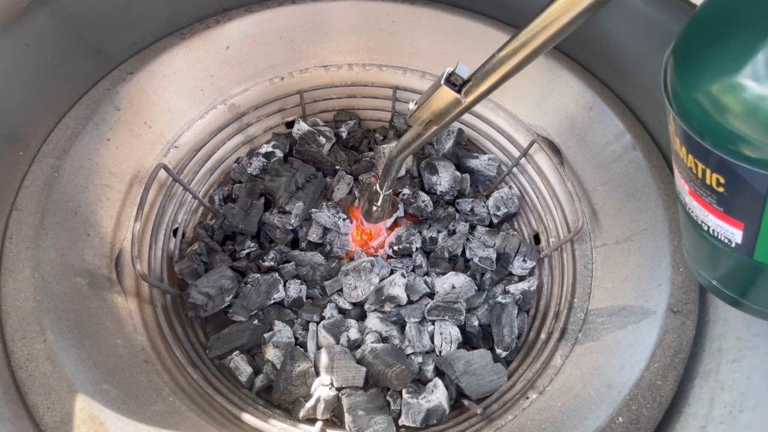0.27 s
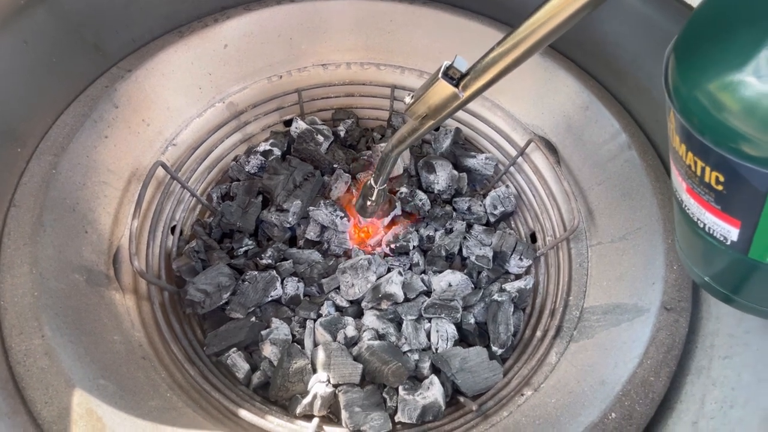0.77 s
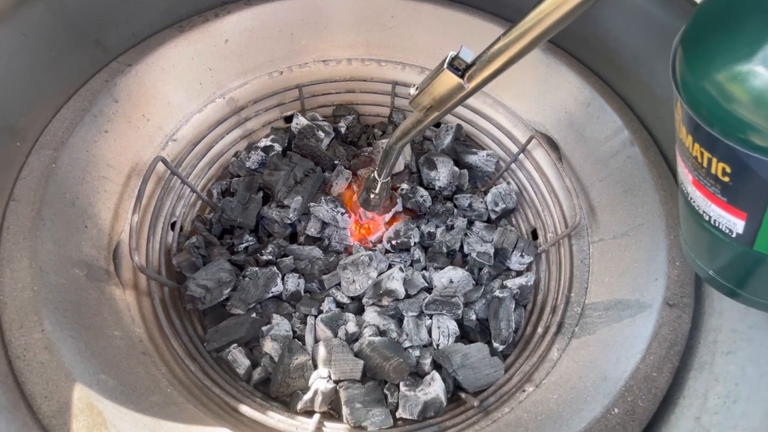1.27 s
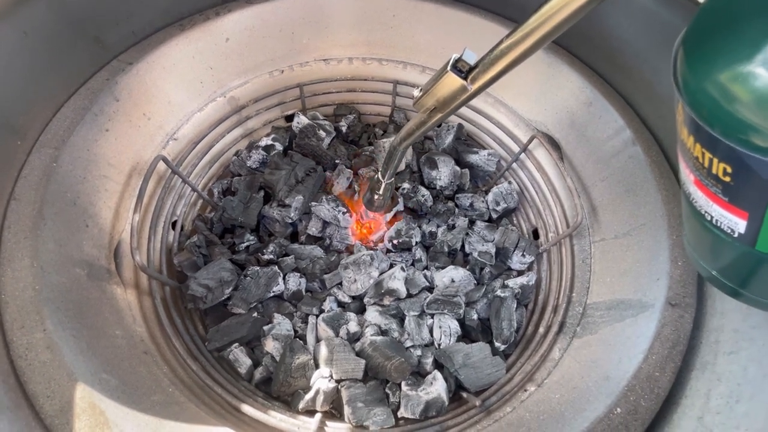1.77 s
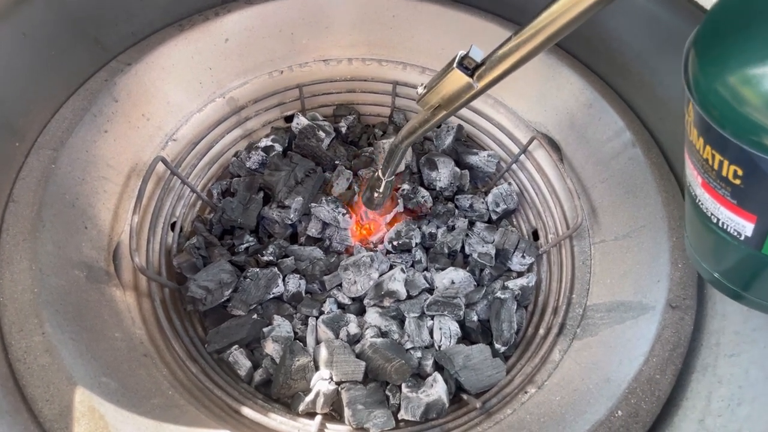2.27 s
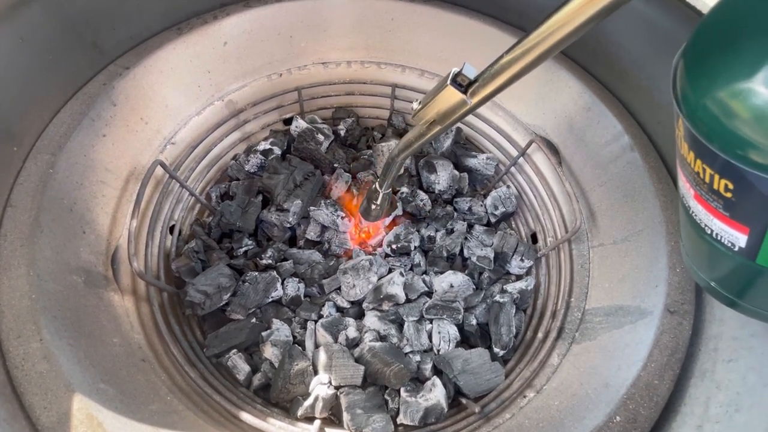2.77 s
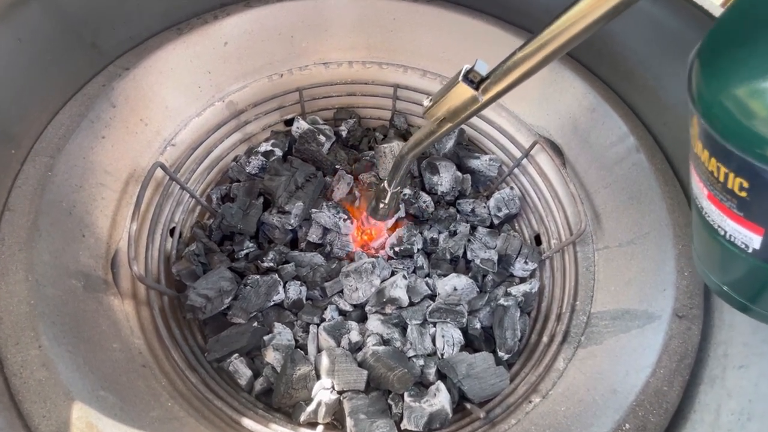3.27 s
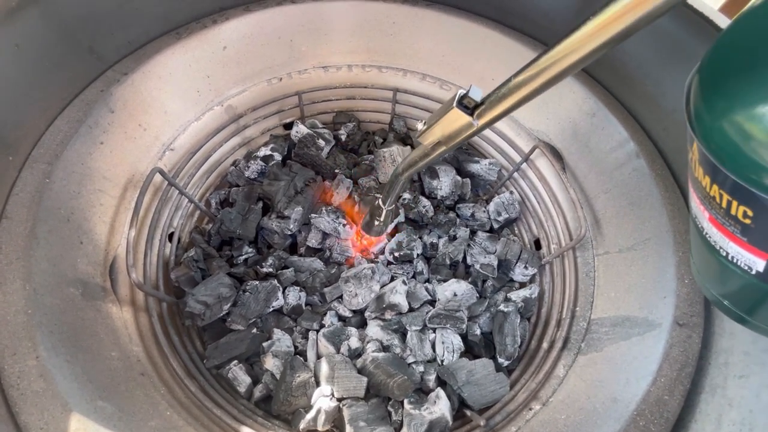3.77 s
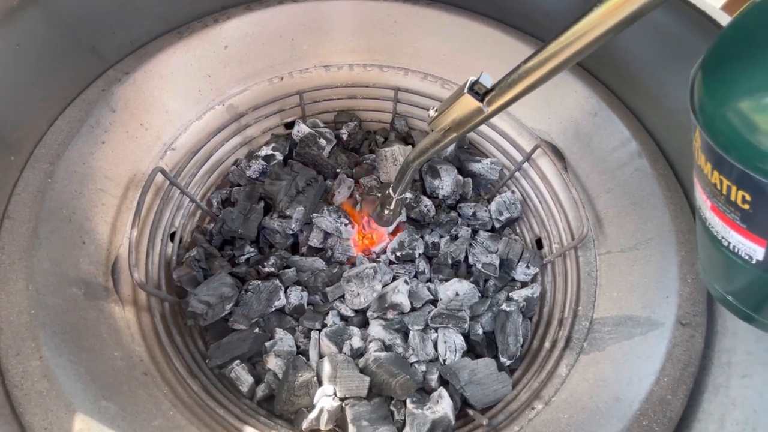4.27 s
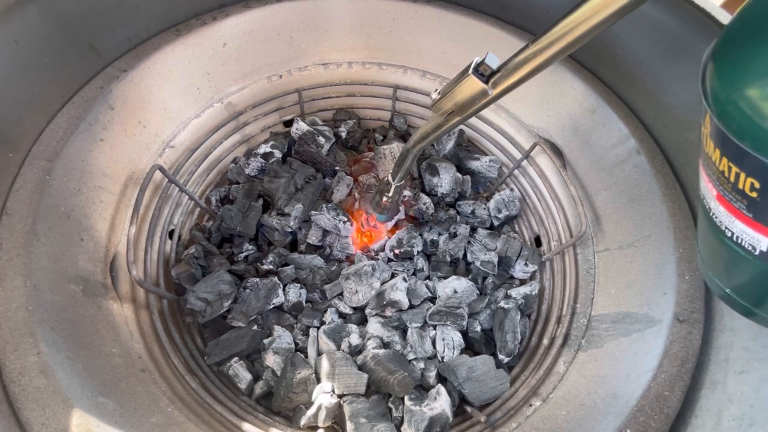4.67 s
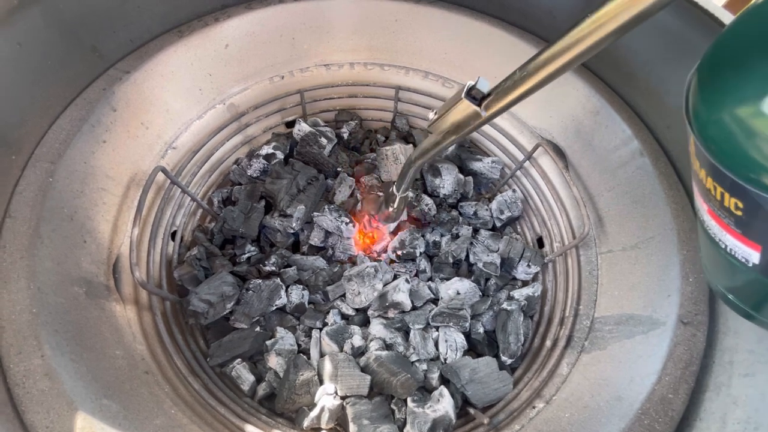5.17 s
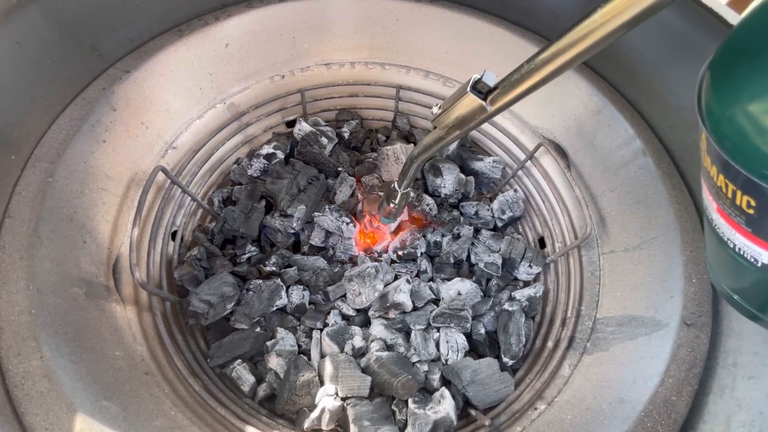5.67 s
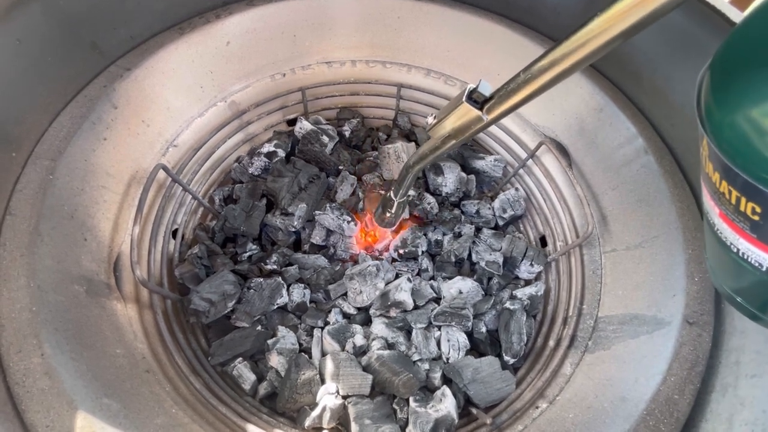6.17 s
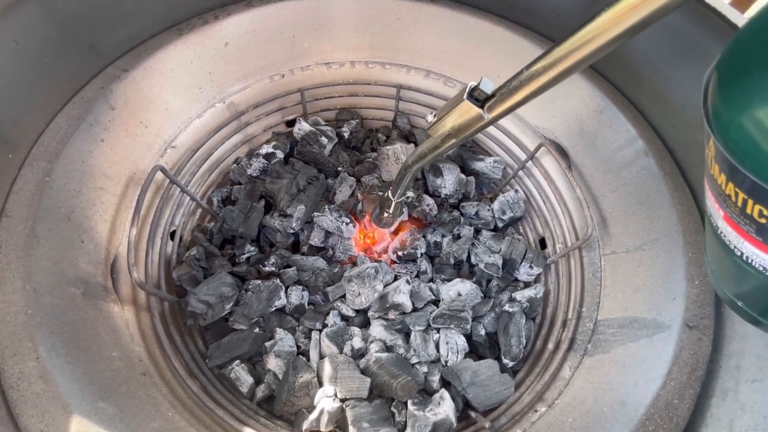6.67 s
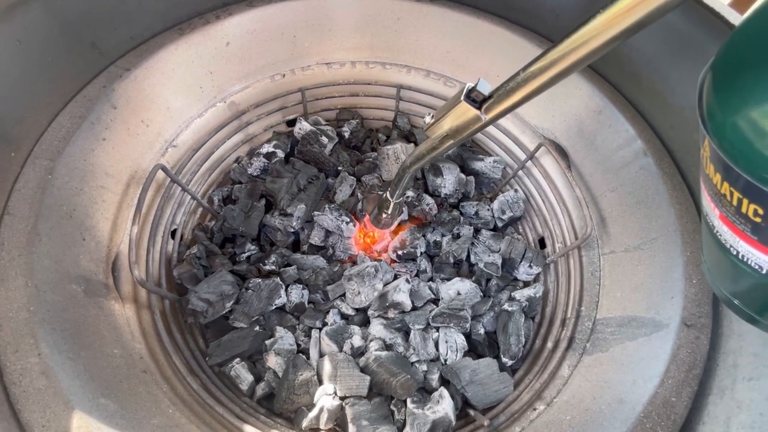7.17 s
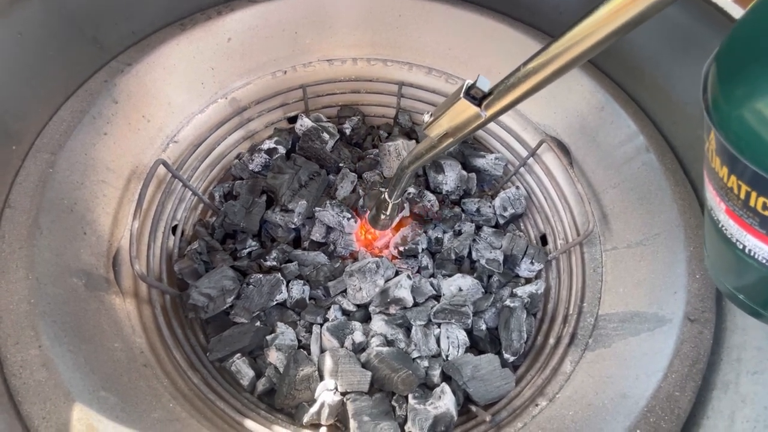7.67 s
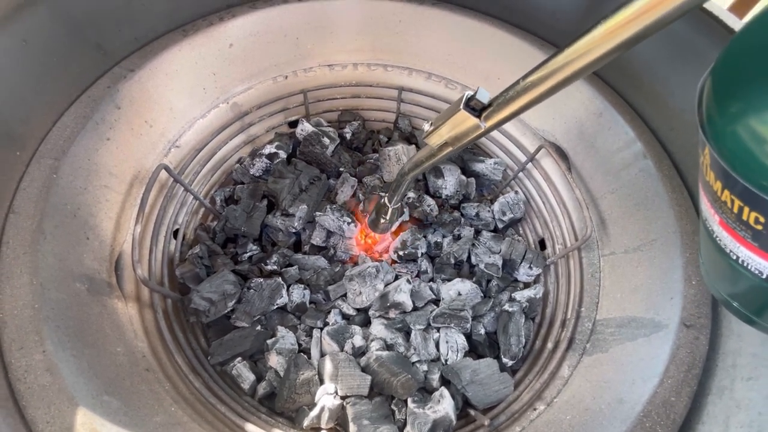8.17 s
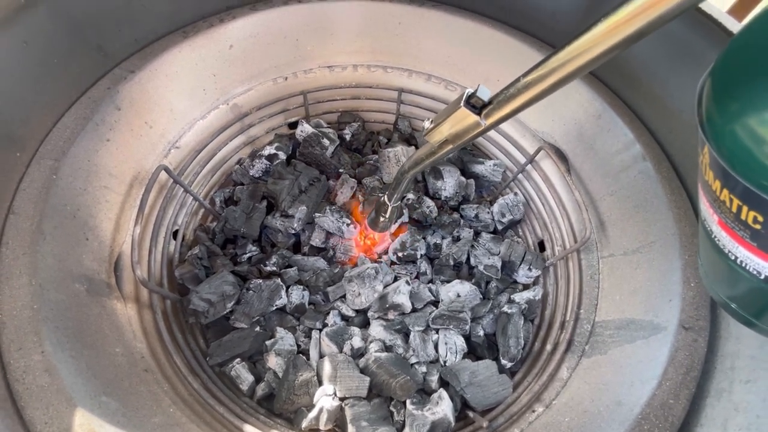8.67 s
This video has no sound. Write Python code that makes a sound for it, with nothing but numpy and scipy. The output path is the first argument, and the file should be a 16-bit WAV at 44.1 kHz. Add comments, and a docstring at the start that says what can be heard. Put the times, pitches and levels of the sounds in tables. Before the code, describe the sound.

Outdoors, a torch jet rushes and nearly whistles at moments while its flame flares, falters, then roars low in a charcoal bowl as wind buffets.

```python
"""A bright gas hiss opens over a fluttering flame: a propane torch on charcoal in a round grill outdoors.
The jet is noise coloured by drifting burner resonances, some of which nearly whistle for a moment.
The flame is low noise that flares, falters, then holds as a roar, with sine bursts for catching gas pockets.
Halfway through, lumpy bass noise rumbles as a gust on the two microphone ports."""
import sys
import numpy as np
from scipy import signal
from scipy.fft import rfft, irfft
from scipy.io import wavfile
from scipy.ndimage import uniform_filter1d

SR = 44100
rng = np.random.default_rng(int(sys.argv[2]) if len(sys.argv) > 2 else 0)


def master(y):
    """Save y as 16-bit WAV."""
    cut = np.clip(np.atleast_2d(y).T, -1, 1)
    pcm = np.round(cut * 32767)  # scale
    wavfile.write(sys.argv[1], SR, pcm.astype(np.int16))


N = 393813

# Levels in the tables are relative: port trims and the levels in the functions come on top.
# Gusts on the ports: (time of the top [s], level [dB], half length [s])
GUSTS = [(1.46, -50, 0.14), (3.83, -41, .14), (4.28, -27.5, 0.15), (4.55, -26, 0.099), (4.87, -28.5, 0.11),
         (5.03, -32, .08), (5.24, -33, 0.12), (5.65, -41, 0.22), (6.7, -42, .65), (8.4, -37, 0.47)]
# Colour of the wind: (frequency [Hz], density [dB per Hz])
WIND_COLOUR = [(20, -29), (40, -8), (62, 0.5), (110, -3), (200, -18), (500, -36), (1200, -62)]
# Breeze tearing at the flame: (time of the top [s], level [dB], half length [s])
FLUTTERS = [(.35, -41, 0.046), (.62, -34, 0.016), (1.25, -42, 0.06), (1.48, -34, 0.15),
            (1.852, -36.5, 0.16), (2.133, -37, 0.047), (2.32, -33, 0.033), (2.88, -38, 0.045),
            (3.87, -37, 0.11), (4.526, -28.5, 0.031)]
# Colour of the tearing flame: (frequency [Hz], density [dB per Hz])
TEAR_COLOUR = [(25, -64), (70, -23), (140, 2), (210, 0.5), (400, -7), (600, -14), (1200, -37), (3000, -63)]
# Flare-ups before the flame holds: (time of the top [s], level [dB], half length [s])
FLARES = [(.08, -35.5, 0.28), (.55, -33, 0.09), (.78, -32.5, 0.14), (1.07, -30, 0.17), (1.37, -25.5, 0.23),
          (1.85, -37.5, 0.18), (2.19, -30, 0.075), (2.28, -32, 0.078)]
# Falters that reshape the flares: (time [s], level change [dB], half length [s])
FALTERS = [(.40, -15, 0.054), (0.66, 1, .015), (0.895, -10, .025), (2.039, -13, 0.048), (2.39, -4, .03)]
# Colour of the roar in the bowl: (frequency [Hz], density [dB per Hz])
BOWL_COLOUR = [(22, -55), (45, -29), (75, -11), (115, -8), (145, 2), (170, -0.5), (200, -10.5), (235, -14),
               (262, -27), (298, -10), (330, -16.5), (380, -31.5), (480, -46), (900, -73)]
# Pockets of gas catching at once: (time [s], peak level [dB])
PUFFS = [(.066, -22.5), (0.613, -24), (1.152, -21), (1.232, -21), (1.323, -19), (1.404, -19), (1.494, -23),
         (2.136, -17), (2.452, -15.5), (2.537, -15), (2.571, -16), (2.701, -13), (2.851, -16.5),
         (3.74, -15.5), (3.802, -14), (4.194, -13.5), (4.687, -15.5), (6.053, -12), (6.682, -11.5),
         (6.89, -14), (6.928, -11.5), (7.012, -14.5), (7.056, -10.5), (7.316, -12), (7.764, -14.5),
         (7.997, -19), (8.435, -12.5)]
# Broad rush between the resonances: (frequency [Hz], density [dB per Hz], left minus right [dB])
RUSH = [(50, -50, 0), (100, -24, 2), (160, -2, -5), (258, -14, 0), (480, -10.5, 0), (840, -16, -2),
        (1257, -9, -3.5), (1450, -17.5, 0.5), (1880, -9.5, .5), (2400, -18, -1), (3000, -12, 0.5),
        (3200, -15, 1), (3500, -19, 2), (4330, -17.5, -2), (4860, -13, 0), (5550, -8, -4), (7250, -18, 2),
        (9500, -16, -2), (11000, -22.5, 0), (12960, -22, 2), (14700, -46, 1), (15500, -17, -2)]
# Resonances of burner and coals: (frequency [Hz], half-power width [Hz], level [dB], left minus right [dB])
RESONANCES = [(316.4, 28, -.5, -7.5), (608, 131, -11.5, -17), (950, 64, -8.5, -10.5),
              (1035.6, 33, 1.5, -1.5), (1668, 52, 3.3, -2.5), (2212, 48.5, 2, -2.5), (2514, 185, -10, -3.5),
              (2870, 110, -9.5, 0), (3413, 160, -12, -5), (3952, 220, -8.5, -0.5), (4666, 137, -5, 0.5),
              (5216, 95, -0.2, 4.5), (5763, 195, 0, -2.5), (6136, 195, -1.3, -6), (6357, 132, 0.34, -1.5),
              (6850, 190, -3, -0.5), (7540, 160, -11, 1), (8140, 260, -11, 6), (9070, 300, -24, 0),
              (10220, 200, -12, -4), (10730, 156, -11.5, -1), (11360, 210, -9.5, -.5), (11700, 200, -20, 0)]
# Extra phase by which bowl echoes make the left port trail: (frequency [Hz], lag [radians])
PORT_LAG = [(150.0, 0.0), (380.0, -1.1), (500.0, 1.9), (640.0, -0.5), (1030.0, -0.9), (1300.0, 0.7),
            (1450.0, -1.2), (1670.0, -1.5), (2215.0, -1.1), (3100.0, -0.6), (3600.0, -0.9), (3800.0, 0.5),
            (4660.0, 0.6), (5220.0, 2.6), (5480.0, 6.9), (5800.0, 6.3), (6000.0, 4.7), (6300.0, 6.2),
            (7100.0, 7.3), (7600.0, 4.1), (8900.0, 3.2), (9450.0, 6.3), (10600, 0), (12400, -6),
            (14000, -12)]
# Likeness of the hiss at the two ports: (frequency [Hz], likeness [0 to 1])
PORT_LIKENESS = [(250.0, 0.33), (320.0, 0.81), (460.0, 0.92), (700.0, 0.54), (820.0, 0.26), (950.0, 0.81),
                 (1150.0, 0.84), (1350.0, 0.39), (1650.0, 0.65), (2050.0, 0.78), (2220.0, 0.92),
                 (2600.0, 0.43), (3250.0, 0.98), (3650.0, 0.57), (4050.0, 0.82), (4400.0, 0.93),
                 (4700.0, 0.57), (5200.0, 0.75), (5480.0, 0.1), (5700.0, 0.69), (6350.0, 0.5),
                 (7050.0, 0.75), (7550.0, 0.29), (8300.0, 0.89), (9000.0, 0.35), (11000, 0.97),
                 (13000, 0.56)]
# Level of the jet's brightest hiss: (time [s], level [dB])
HISS = [(0.0, -3), (.6, -2.8), (1.24, -1), (1.4, -5), (1.66, -0.5), (1.9, -2), (2.3, -1.5), (2.6, -1.6),
        (3.4, -1.8), (3.7, -2), (4.3, -3), (4.62, 1), (4.86, -5), (5.3, -1), (6.4, -1.9), (7.42, 0.5),
        (8.5, -1), (8.92, 0)]
# How the flame's reach into the coals recolours the jet: (frequency [Hz], tilt [dB per unit of reach])
REACH_COLOUR = [(200, -1.5), (320, 1), (500, -0.5), (1100, -0.5), (1700, -0.5), (2600, 0.1), (4500, 0.55),
                (5200, 0), (6600, -0.5), (8000, 0.3), (9300, 0), (11000, -0.7)]
# Moments of near-whistling: (time of the top [s], pitch [Hz], lift [dB], half length [s])
SINGS = [(1.1, 6340, 7.5, .2), (1.667, 6630, 10, .12), (2.3, 6340, 4.5, 0.24), (2.798, 5260, 9.5, 0.13),
         (3.4, 6290, 11.5, 0.094), (4.0, 5170, 4.5, 0.12), (4.2, 6270, 6, 0.09), (4.58, 5820, 0, 0.17),
         (5.27, 6650, 5, 0.076), (5.862, 6380, 5, 0.25), (7.3, 5740, 6, .4), (7.847, 2280, 5, 0.073),
         (8.883, 6230, 7.5, 0.18)]

# The flame catches again with a deep whump
WHUMP_S, WHUMP_DB, WHUMP_DECAY_S = 2.118, -31, 0.041
PUFF_RISE_S, PUFF_FALL_S = 0.0099, 0.016
# The flame holds; its roar grows as the coals heat up, then eases a little
HOLD_S, CATCH_S = 2.44, 0.0089
FULL_S, FULL_DB, GROW_DB_PER_S, EASE_DB_PER_S = 6.9, -22, 0.5, 0.85
# The deep bass fills in as the fire grows
THIN_DB, FILL_DB_PER_S, FILLED_DB = -39, 8, -2.5
# The burner's resonances rise as it heats: share of their pitch per second, and when they are in tune
HEAT_PER_S, IN_TUNE_S = 0.0014, 4.5
# The jet starts a little soft and comes up to strength
SOFT_DB, WARM_S = -0.3, 1
# The hand settles once, and the flame digs deeper into the coals
SETTLE_S, SETTLE_TAKES_S, REACH_BEFORE, REACH_AFTER = 5.04, 0.35, -1, 2
SING_WIDTH_HZ = 84
PORT_DELAY_S = 0.000476  # the hiss reaches the left port later than the right
EDGE_HZ = 15750


def gain_of(db):
    """Decibels to amplitude."""
    return 10 ** (np.asarray(db) / 20)


def evened(x):
    """Scales to an rms of one."""
    return x / np.sqrt(np.mean(x ** 2) + 1e-20)


def read(points, hz, axis=1):
    """One column of a spectrum table, joined on a log-frequency axis."""
    table = np.array(points)
    return np.interp(np.log(hz + 1), np.log(table[:, 0] + 1), table[:, axis])


def follow(rows, t, axis=1):
    """One column of a curve at the times t."""
    table = np.array(rows)
    return np.interp(t, table[:, 0], table[:, axis])


def coloured(points):
    """Noise shaped to the given spectrum, at an rms of one."""
    spectrum = rfft(rng.standard_normal(N))
    colour = gain_of(read(points, np.fft.rfftfreq(N, 1 / SR)))
    return evened(irfft(spectrum * colour, N))


def patches(shape, seconds, width_hz, step_s, step_hz):
    """A smooth random field over time and frequency, with blobs of the given size."""
    along = np.fft.fftfreq(shape[0], step_s)[:, None] * seconds
    across = np.fft.rfftfreq(shape[1], step_hz) * width_hz
    smoothing = np.exp(-2 * (along ** 2 + across ** 2))
    field = np.fft.rfft2(rng.standard_normal(shape)) * smoothing
    return evened(np.fft.irfft2(field, shape))


def bell(x, centre, half_width):
    """A smooth hump that peaks at one."""
    return np.exp(-((x - centre) / half_width) ** 2)


def step(t, at_s, takes_s):
    """A smooth change from zero to one."""
    return .5 + .5 * np.tanh((t - at_s) / takes_s)


def swells(rows):
    """Amplitude of smooth rises and falls, whose powers add."""
    t = np.arange(N) / SR
    return np.sqrt(sum((gain_of(db) * bell(t, s, length)) ** 2 for s, db, length in rows))


def whump(t):
    """Amplitude of the deep rush of air when the flame catches again."""
    age = np.maximum(t - WHUMP_S, 0)
    return gain_of(WHUMP_DB) * np.minimum(age / PUFF_RISE_S, 1) * np.exp(-age / WHUMP_DECAY_S)


def wind(left_db=-7.5, right_db=3, lumpy_db=2.0):
    """Lumpy eddies, unrelated at the two ports and stronger on the right; the whump shares their colour."""
    t = np.arange(N) / SR
    lumps = coloured([(1, 0), (12, 0), (30, -40), (100, -120)])
    level = swells(GUSTS) * gain_of(lumpy_db * np.tanh(lumps)) + whump(t)
    left = gain_of(left_db) * coloured(WIND_COLOUR)
    right = gain_of(right_db) * coloured(WIND_COLOUR)
    return level * np.array([left, right])


def flutter(left_db=-2, right_db=2):
    """Short ragged bursts where the breeze pulls the flame about."""
    left = gain_of(left_db) * coloured(TEAR_COLOUR)
    right = gain_of(right_db) * coloured(TEAR_COLOUR)
    return swells(FLUTTERS) * np.array([left, right])


def burning(t):
    """Amplitude of the roar: separate flares, then a flame that holds, slowly grows and eases off."""
    growth_db = GROW_DB_PER_S * np.maximum(FULL_S - t, 0)
    easing_db = EASE_DB_PER_S * np.maximum(t - FULL_S, 0)
    held = step(t, HOLD_S, CATCH_S) * gain_of(FULL_DB - growth_db - easing_db)
    falter_db = sum(db * bell(t, s, length) for s, db, length in FALTERS)
    return np.hypot(swells(FLARES) * gain_of(falter_db), held)


def roar(steadiness=0.37, apart_db=-19, deep_hz=86):
    """Unsteady burning booms in the bowl; a little of it reaches each port by its own path."""
    t = np.arange(N) / SR
    boom = coloured(BOWL_COLOUR)
    # the fixed gas flow steadies the mean power under the fast flutter
    power = uniform_filter1d(boom ** 2, size=4400)  # about 0.1 s
    boom = evened(boom / power ** (steadiness / 2))
    boom = boom + gain_of(apart_db) * np.array([coloured(BOWL_COLOUR), coloured(BOWL_COLOUR)])
    # a larger fire has larger eddies, so the bass fills in as the coals catch
    deep = signal.sosfiltfilt(signal.butter(5, deep_hz, fs=SR, output="sos"), boom)
    deep_gain = gain_of(np.minimum(THIN_DB + FILL_DB_PER_S * t, FILLED_DB))
    return (boom + (deep_gain - 1) * deep) * burning(t)


def pocket(t, s):
    """Envelope of a pocket of gas that catches fast and burns out more slowly."""
    return bell(t, s, np.where(t < s, PUFF_RISE_S, PUFF_FALL_S))


def puffs(boom, bowl_hz=143, takeover=0.31):
    """Each pocket of gas partly takes over from the roar and gives the air in the bowl a short push."""
    t = np.arange(N) / SR
    for s, db in PUFFS:
        burst = pocket(t, s)
        push = gain_of(db) * burst * np.sin(2 * np.pi * bowl_hz * (t - s))
        boom = boom * (1 - takeover * burst) + push
    return boom


def burner(hz):
    """Gain of the burner's resonances over the broad rush; each port hears its own share of them."""
    port = np.array([[.5], [-.5]])  # left, right: half the level difference each
    power = gain_of(read(RUSH, hz) + port * read(RUSH, hz, axis=2)) ** 2
    for mode_hz, width, db, pan in RESONANCES:
        offset = 2 * (hz - mode_hz) / width
        power = power + gain_of(db + port * pan) ** 2 / (1 + (np.sqrt(2) - 1) * offset ** 2) ** 2
    return np.sqrt(power)


def singing(t, hz):
    """Lift in dB, over time and frequency, where the jet nearly whistles on one resonance."""
    return sum(db * np.outer(bell(t, s, length), bell(hz, pitch, SING_WIDTH_HZ))
               for s, pitch, db, length in SINGS)


def jet(level_db=-25.5, flicker_db=0.61, patchy_db=0.99, ripple_db=2.5, swirl_db=2.5,
        bright_hz=6100, bright_width_hz=1000, sway=0.0045, wander=0.0034, size=2048):
    """Turbulent gas excites the burner's resonances; eddies make them flicker and wander."""
    hop = size // 4
    hz, t = np.fft.rfftfreq(size, 1 / SR), np.arange(N // hop + 2) * hop / SR
    shape, steps = (len(t), len(hz)), (hop / SR, SR / size)

    # noise spectra for the two ports, alike only in part
    a, b, c, d = rng.standard_normal((4, *shape))
    same = np.clip(read(PORT_LIKENESS, hz), 0, 1)
    right = a + 1j * b
    left = same * right + np.sqrt(1 - same ** 2) * (c + 1j * d)
    left = left * np.exp(-1j * (2 * np.pi * hz * PORT_DELAY_S + read(PORT_LAG, hz)))

    # the heat of the gas lifts and sways all resonances together; eddies nudge each on its own
    detune = sway * patches(shape, 0.16, 40000, *steps)[:, :1]
    detune = detune + wander * patches(shape, 0.059, 900, *steps)
    heard_hz = hz * (1 + detune - HEAT_PER_S * (t - IN_TUNE_S)[:, None])
    colour = np.array([np.interp(heard_hz, hz, gain) for gain in burner(hz)])

    bright, treble = bell(hz, bright_hz, bright_width_hz), np.minimum(hz / 3000, 1)
    reach = REACH_BEFORE + (REACH_AFTER - REACH_BEFORE) * step(t, SETTLE_S, SETTLE_TAKES_S)
    field_db = np.outer(reach, read(REACH_COLOUR, hz)) + np.outer(follow(HISS, t), bright)
    field_db += SOFT_DB * np.exp(-t / WARM_S)[:, None]
    field_db += flicker_db * patches(shape, 0.009, 7700, *steps) * treble
    field_db += patchy_db * patches(shape, 0.031, 330, *steps)
    # echoes from the bowl carve fine ripples that shift slowly with the nozzle
    field_db += ripple_db * patches(shape, 0.89, 52, *steps) * treble
    # the brightest resonances swirl, and take turns at nearly whistling
    field_db += singing(t, hz)
    field_db += swirl_db * patches(shape, 0.17, 85, *steps) * bright

    spectra = np.array([left, right]) * colour * gain_of(field_db)
    hiss = signal.istft(spectra.swapaxes(1, 2), nperseg=size, noverlap=size - hop)[1][:, :N]
    return gain_of(level_db) * evened(hiss)


def scene(left_db=-0.45, right_db=-1.0, late_s=0.00023):
    """Wind, flutter, flame and jet together; the boom reaches the left port a moment after the right."""
    left, right = puffs(roar())
    left = np.interp(np.arange(N) - late_s * SR, np.arange(N), left)
    flame = np.array([gain_of(left_db) * left, gain_of(right_db) * right])
    return wind() + flutter() + flame + jet()


def record(dry):
    """A steep low-pass limits the band at the top of the treble."""
    lowpass = signal.firwin(511, EDGE_HZ, window=("kaiser", 9), fs=SR)
    return signal.oaconvolve(dry, lowpass[None], "same")


dry = scene()
out = record(dry)
master(out)
```